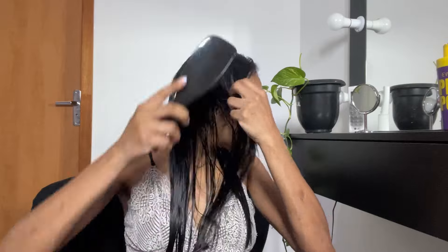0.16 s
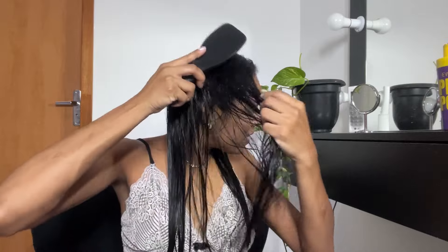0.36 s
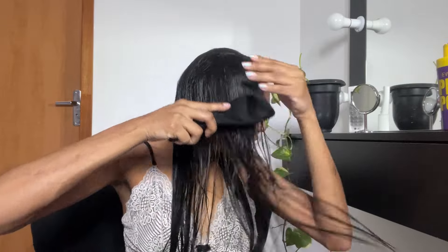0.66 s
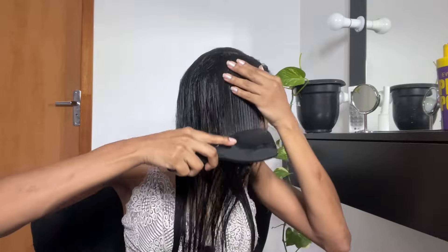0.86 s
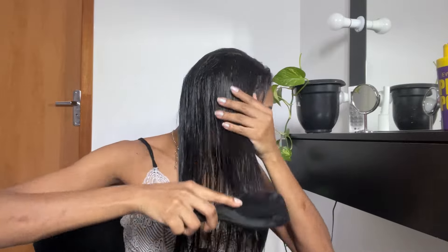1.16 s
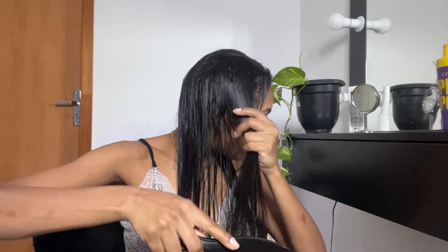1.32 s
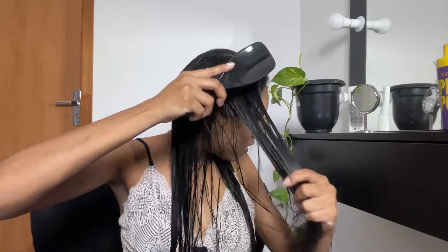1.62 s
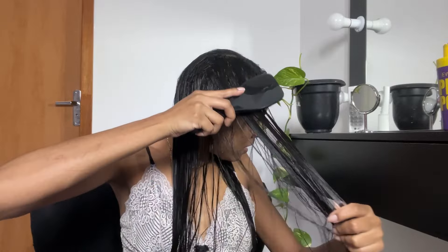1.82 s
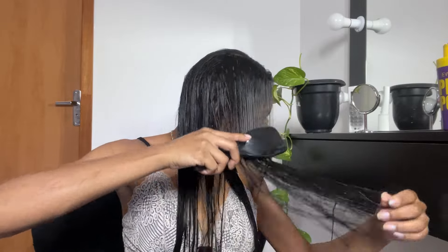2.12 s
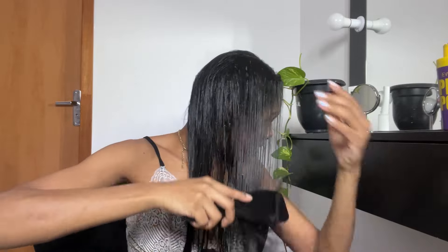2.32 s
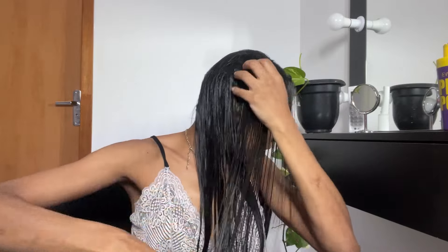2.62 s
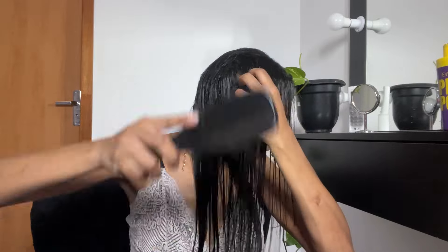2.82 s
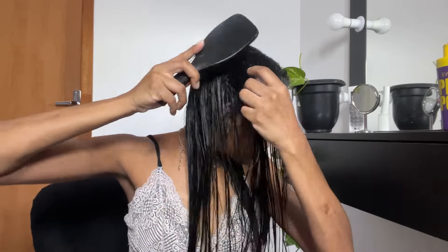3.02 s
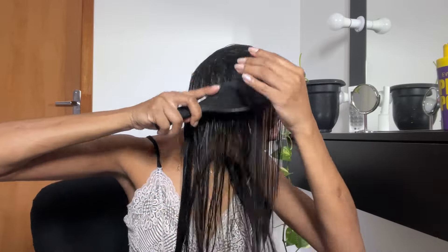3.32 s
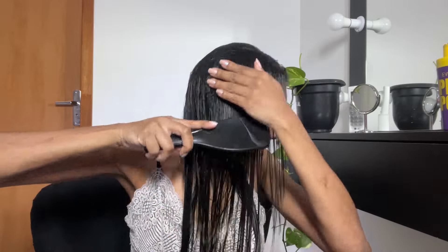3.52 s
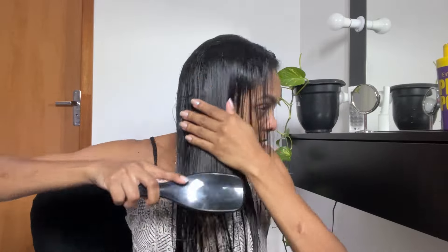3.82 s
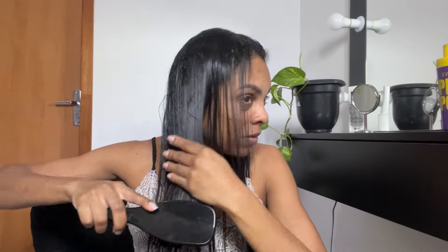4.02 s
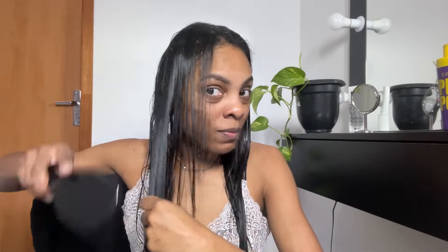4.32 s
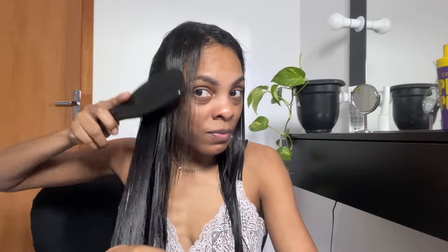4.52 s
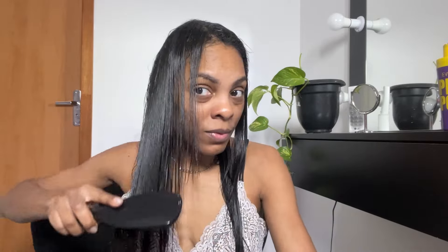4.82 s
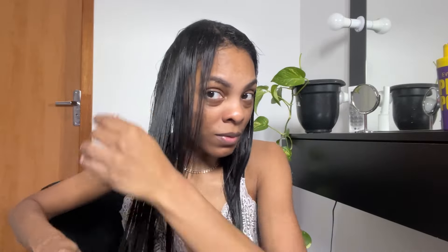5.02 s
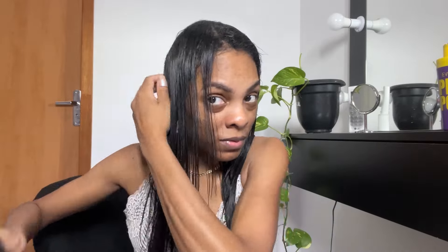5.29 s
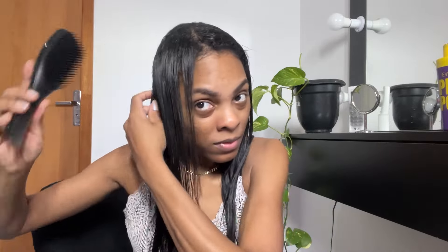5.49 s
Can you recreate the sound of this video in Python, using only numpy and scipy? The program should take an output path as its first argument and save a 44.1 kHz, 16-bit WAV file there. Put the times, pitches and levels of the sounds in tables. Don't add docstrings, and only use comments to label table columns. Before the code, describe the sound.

A dry, small bedroom heard through a phone's stereo microphones about a metre away. A deep motor hum near 60 Hz throbs slowly throughout, with faint air and hiss. At 0 s fingers rasp softly and wet strands hiss. From 0.4 to 1.3 s a brush scrapes through in scratchy strokes, with hollow mid-pitched paddle knocks, bristle ticks and dull bumps, strongest around 0.5-0.7 s. A softer stroke runs from 1.7 to 2.3 s, with a brief catch at 2.5 s, then near quiet. Stronger raking arrives at 3.1-3.6 s, with a sharp knock near 3.35 s, fading into light scraping. A clack and thuds come at 4.2 s; a smoother hissing stroke starts at 4.6 s. At 4.85-5.1 s a hard pull gives a short low groan, cushion thuds and a rapid run of snaps and woody cracks, the loudest moment. Small taps trail off, and a faint swish near 5.4 s leaves the hum.

```python
import sys
import numpy as np
from scipy import signal
from scipy.fft import rfft, irfft
from scipy.io import wavfile
from scipy.ndimage import uniform_filter1d

SR = 44100
rng = np.random.default_rng(int(sys.argv[2]) if len(sys.argv) > 2 else 0)


def rack_gain(trim_db):
    fader = np.asarray(trim_db, float)
    return 10 ** (fader / 20)


def digitize_waveform(pressure):
    field = np.atleast_2d(pressure).T
    bounded = np.clip(field, -1, 1)
    quanta = np.round(bounded * 32767).astype(np.int16)
    wavfile.write(sys.argv[1], SR, quanta)


N = 249312
TIME = np.arange(N) / SR
FREQ = np.arange(N // 2 + 1) * SR / N + 1

# f/Hz, left leads by/rad, left minus right/dB, direct share [0..1] of near sound, of room air
PORTS = [(60, -.05, -5, .97, .9), (260, -.3, -3.5, .72, .72), (800, -.6, -2.5, .5, .15),
         (1300, -.15, -1, .92, .4), (2100, -.65, -1.5, .6, .15), (4300, -2.2, -3.5, .2, .1),
         (5400, -2.6, -4, .37, .1), (7400, -1.6, -2, .55, .5), (9400, -.05, -.2, .95, .92),
         (10700, .1, 0, .97, .95), (12500, 2.2, 0, .92, .88), (14250, 3.12, 0, .98, .97),
         (15000, 3.7, 0, .88, .86), (15700, 4.1, 0, .85, .85)]
# f/Hz, width/Hz, level/dB
PADDLE_MODES = [(925, 67, -3.5), (1062, 29, 2.5), (1150, 46, 2.5), (1270, 82, -2), (1387, 47, 0.5),
                (1720, 210, -11.5)]
# t/s, peak level/dB, ring f/Hz, t60/s
BUMPS = [(0.494, -41, 724, 0.04), (0.512, -39, 662, 0.058), (0.584, -39.5, 756, 0.09),
         (0.68, -32.5, 507, 0.043), (0.699, -42.5, 553, 0.13), (1.16, -48, 1174, 0.04),
         (1.275, -53.5, 1045, 0.076), (1.741, -51, 486, 0.056), (1.906, -51, 462, 0.12),
         (1.93, -38, 530, 0.032), (2.526, -68, 510, 0.044), (2.568, -57, 400, 0.044),
         (3.114, -52.5, 530, 0.069), (3.166, -48, 1150, 0.025), (3.215, -43, 500, 0.06),
         (3.257, -39, 730, 0.05), (3.358, -27.5, 570, 0.023), (3.516, -37.5, 518, 0.056),
         (4.1725, -31.5, 1250, 0.026), (4.183, -39, 1076, 0.05), (4.2, -39.5, 513, 0.14),
         (4.252, -34, 554, 0.028), (4.272, -42, 520, 0.036), (4.28, -41, 500, 0.045),
         (4.36, -67, 415, 0.047), (4.523, -64, 550, 0.023), (4.599, -54, 1210, 0.17),
         (5.074, -36.5, 537, 0.071), (5.117, -39.5, 508, 0.068), (5.206, -52, 483, 0.054)]
# t/s, peak level/dB, paddle ring relative/dB, bright part relative/dB
SNAPS = [(0.4955, -45.5, 3, -26), (0.585, -43, -8, -26), (0.678, -51, -5, 1), (0.838, -54, -5, -2),
         (0.8432, -50.5, -10, 8.5), (1.2254, -59, -1, -27), (1.906, -48.5, -14, -30),
         (1.9288, -55, -7, -20), (2.5275, -53.5, -2, -6), (2.538, -57, -4, -10), (2.568, -50.5, -15, -18),
         (2.85, -73, -13, -4), (2.9284, -69, -7, -11.5), (3.206, -62, 3, -15), (3.357, -44.5, -10, -30),
         (3.389, -47, -5, -20), (3.5142, -59, -11, -15), (4.1722, -52, 14, -28), (4.199, -57.5, 19.5, -19),
         (4.361, -59.5, 1, -28.5)]
# t/s, peak level/dB, paddle ring relative/dB, bright part relative/dB
TEAR = [(4.9325, -59, 19.5, -8), (4.943, -49, -6, 5), (4.9545, -45.5, 12, -4), (4.973, -45, 11, -6),
        (4.9863, -54, 8, -2), (4.9921, -49, 9, -8), (4.994, -40.5, -3, -3), (5.008, -53, -13, 4),
        (5.016, -40.5, 10, -18), (5.0198, -38, 0, -19), (5.026, -41, 1, -20), (5.0363, -49, -4, -14),
        (5.044, -51, 21, -19), (5.053, -44, 1, -3), (5.0619, -44, -4, -8), (5.0671, -45.5, 7, -4),
        (5.076, -48, 0, -10)]


def curves(table):
    s, *columns = np.transpose(table)
    return [np.interp(TIME, s, column) for column in columns]


def over_hz(table):
    hz, *columns = np.transpose(table)
    return [np.interp(np.log(FREQ), np.log(hz), column) for column in columns]


def unit(x):
    return x / np.sqrt(np.mean(x ** 2))


def colour(x, table):
    return irfft(rfft(x) * rack_gain(over_hz(table)[0]), N)


def ring(x, *stages):
    f = np.tan(np.pi * np.minimum(FREQ / SR, 0.49)) * SR / np.pi
    out = rfft(x)
    for modes in stages:
        response = 0
        for k, (hz, width, db) in enumerate(modes):
            damping = 1j * f * width
            response = response + (-1) ** k * rack_gain(db) * damping / (hz ** 2 - f ** 2 + damping)
        out = out * response
    return irfft(out, N)


def walk(rate):
    k = int(SR / rate)
    held = np.repeat(rng.standard_normal(N // k + 1), k)
    return 1.22 * uniform_filter1d(uniform_filter1d(held, k), k)[:N]


def flicks(rate, spread_db):
    chance = rng.random((3, N))
    size = rack_gain(-spread_db * np.log(chance[2] + 0.043))
    return unit((chance[0] < rate / SR) * np.sign(chance[1] - 0.5) * size)


def strokes(rows, rest_db, on_db_per_s, off_db_per_s):
    step = TIME[::64]
    power = rack_gain(2 * rest_db)
    for s, length, start_db, end_db in rows:
        held = np.interp(step, [s, s + length], [start_db, end_db])
        rise = on_db_per_s * np.maximum(s - step, 0)
        fall = off_db_per_s * np.maximum(step - s - length, 0)
        power = power + rack_gain(2 * (held - rise - fall))
    return np.interp(TIME, step, 10 * np.log10(power))


def blows(rows):
    out, t = np.zeros(N), TIME[:SR // 10]
    for s, db, hz, t60 in rows:
        i = int(s * SR)
        tone = np.sin(2 * np.pi * hz * t) + 0.26 * np.sin(2 * np.pi * 1.23 * hz * t)
        push = 1 - np.exp(-t * hz / 1.42)
        out[i:i + len(t)] += rack_gain(db + 3.5) * push * tone * rack_gain(-60 * t / (0.61 * t60))
    return out


def echoed(x):
    return np.array([x, np.roll(x, shift=71), -np.roll(x, shift=113)])


def ports(direct, diffuse, share):
    lead, balance_db = over_hz(PORTS)[:2]
    half, share = np.array([[0.5], [-0.5]]), np.clip(share, 0, 1)
    near = np.sqrt(share) * rfft(direct) * np.exp(1j * half * lead)
    mix = near + np.sqrt(1 - share) * rfft(diffuse)
    return irfft(mix * rack_gain(half * balance_db), N)


def room(x, early):
    early_s, t60_s = 0.0059, 0.33
    t = TIME[:SR // 2]
    decay = early * np.exp(-t / early_s) + 0.87 * rack_gain(-60 * t / t60_s)
    echo = rng.standard_normal((2, len(t))) * decay
    echo = echo / np.sqrt(np.sum(echo ** 2, axis=1, keepdims=True))
    return signal.fftconvolve(x, echo, axes=1)[:, :N]


def air():
    # f/Hz, level/dB per Hz
    air_spectrum = [(25, -112), (40, -93), (54, -73.5), (80, -78.5), (160, -91), (250, -92.5), (500, -97.5),
                    (800, -105), (1600, -112), (3000, -117), (6000, -120), (10000, -119), (13000, -118),
                    (15700, -119)]
    a, b, c = (colour(rng.standard_normal(N), air_spectrum) * np.sqrt(SR / 2) for _ in range(3))
    return ports(a, np.array([b, c]), over_hz(PORTS)[3]) * rack_gain(0.92 * walk(3.67))


def hum():
    # f/Hz, level/dB, first in step with the steady motor at t/s
    slow_motor = [
        (58.405, -57.3, .2543),
        (57.885, -59.8, .0676),
    ]
    # t/s, length/s, start level/dB, end level/dB
    loads = [(.55, 0.43, -63, -65), (1.45, 0.39, -74, -63.5), (2.9, 1.48, -63.5, -62),
             (4.72, 0.39, -66, -63.5), (5.2, .4, -62.5, -60.5)]
    # t/s, level/dB
    hum_swell = [
        (4.82, 0),
        (4.95, 3.5),
        (5.15, 0),
        (5.42, -4.5),
        (5.6, 0),
    ]
    motor_hz, motor_db, second_db = 61.98, -52, -69.5
    phase = 2 * np.pi * motor_hz * TIME
    lags = [(rack_gain(db), 2 * np.pi * (motor_hz - hz) * (TIME - s)) for hz, db, s in slow_motor]
    side = np.array([[-0.2], [0.2]])
    slow = sum(size * np.cos(phase - lag + side) for size, lag in lags)
    beat = np.abs(1 + sum(size * np.exp(-1j * lag) for size, lag in lags) / rack_gain(motor_db))
    load_db = strokes(loads, second_db, 90, 70)
    second = rack_gain(load_db + 2.15 * walk(6)) * beat ** 0.39 * np.cos(2 * phase)
    strain_db = 0.15 * (load_db - load_db.mean())
    first = rack_gain(motor_db + strain_db + 0.3 * walk(1.4)) * np.cos(phase)
    balance_db = np.array([[-2.6], [2.1]])
    return np.sqrt(2) * (first + slow + second) * rack_gain(curves(hum_swell)[0] + balance_db)


def fingers():
    # t/s, length/s, start level/dB, end level/dB
    rakes = [(0, 0.2, -73.5, -85)]
    # f/Hz, width/Hz, level/dB
    nails = [(1690, 210, 0)]
    return rack_gain(strokes(rakes, -120, 300, 150)) * unit(ring(flicks(2500, 1.9), nails, nails))


def speed():
    # t/s, length/s, speed at start/dB, at end/dB, coarse rub relative/dB
    slides = [(0, 0.025, -56, -66, -16), (0.042, 0.38, -72, -83, -9.5), (0.392, 0.11, -79, -60.5, -1),
              (0.512, 0.17, -61.5, -60.5, -2.5), (.7, 0.16, -61.5, -65.5, -11),
              (0.844, 0.019, -57.5, -64, -3), (.862, 0.028, -62, -60, -11), (0.9, 0.25, -61, -72.5, -6),
              (1.143, 0.19, -65.5, -78, -3), (1.713, 0.21, -69, -69.5, -4.5),
              (1.93, 0.32, -65.5, -62, -12.5), (2.26, 0.23, -71.5, -77, -2.5),
              (2.539, 0.022, -62.5, -76, 1.5), (2.692, 0.043, -68, -68, -27), (2.803, 0.053, -87, -80, -15),
              (3.205, 0.083, -67, -57.5, -2), (3.307, 0.17, -58, -64.5, -6.5),
              (3.511, 0.21, -62.5, -61, -8.5), (3.743, 0.42, -67, -84, 0), (4.176, 0.018, -70, -66, 5),
              (4.537, 0.059, -69.5, -58, -1.5), (4.606, 0.37, -54, -74, -8.5),
              (4.944, 0.049, -61, -59.5, -1), (4.996, 0.072, -55, -56, -7.5), (5.08, 0.054, -73, -102, 7),
              (5.376, 0.07, -83, -76, -11)]
    edges = 600, 402

    def shifted(share, db):
        return [(s, n, a + share * rub + db, b + share * rub + db) for s, n, a, b, rub in slides]

    return (strokes(shifted(1, 0), -96, *edges),
            strokes(shifted(0, 0), -119, *edges),
            strokes(shifted(-0.73, -8), -88.5, *edges))


def hair():
    # f/Hz, level/dB per Hz
    rub = [(3000, -4), (4000, -4.5), (5400, 2.5), (7500, -5.5), (9000, -10), (11000, -26)]
    # f/Hz, level/dB per Hz
    sizzle = [(6000, -22.5), (8000, -18), (10500, -8.5), (12500, -7.5), (15000, -5)]
    # f/Hz, level/dB per Hz
    wisp = [(10500, -27), (12500, -3.5), (14000, 4), (15700, -2)]
    rub_db, sizzle_db, wisp_db = speed()
    slide = rng.standard_normal((3, N)) + 0.46 * echoed(flicks(1200, 3.2))
    slide = slide * rack_gain(0.86 * walk(60))
    wisps = rng.standard_normal((3, N)) * rack_gain(0.92 * walk(30))
    return (rack_gain(rub_db - 2.0 + 0.56 * walk(8.1)) * unit(colour(slide, rub))
            + rack_gain(sizzle_db - 0.5 + 1.3 * walk(5.99)) * unit(colour(slide, sizzle))
            + rack_gain(np.minimum(wisp_db, -79) + 9.5) * unit(colour(wisps, wisp)))


def snaps():
    dull, bright, knock = np.zeros((3, N))
    t = TIME[:SR // 100]
    swell = (t / 0.0012) ** 2 * np.exp(2 - 2 * t / 0.0012)
    for s, db, paddle_db, bright_db in SNAPS + TEAR:
        i = int(s * SR)
        crack = rng.standard_normal(len(t)) * swell
        dull[i:i + len(t)] += rack_gain(db - 2.5) * crack
        bright[i:i + len(t)] += rack_gain(db + bright_db - 6.0) * crack
        knock[i + 40] += rack_gain(db + paddle_db + 32)
    return (ring(dull, [(2520, 2080, 7.7)])
            + ring(bright, [(7400, 44000, 0)], [(8100, 55000, 0)])
            + ring(knock, PADDLE_MODES))


def cracks():
    # t/s, peak level/dB, ring f/Hz
    crack_rows = [(4.9359, -39, 1100), (4.9742, -29.5, 1490), (4.9863, -31, 1410), (4.993, -31, 1230),
                  (5.0172, -31, 1280), (5.0206, -28, 1250), (5.027, -29.5, 1550), (5.036, -32, 1470),
                  (5.0535, -34, 1190), (5.063, -36.5, 1300)]
    t60_s = 0.012
    out, t = np.zeros(N), TIME[:SR // 20]
    for s, db, hz in crack_rows:
        i = int(s * SR)
        out[i:i + len(t)] += rack_gain(db + 1 - 60 * t / t60_s) * np.sin(2 * np.pi * hz * t)
    return out


def groan():
    # t/s, f/Hz, level/dB
    first_groan = [
        (4.846, 199.9, -67),
        (4.857, 197.2, -51),
        (4.886, 203.5, -35.5),
        (4.899, 208.5, -39),
        (4.906, 214, -61),
    ]
    # t/s, f/Hz, level/dB
    second_groan = [(4.915, 208.2, -39.5), (4.94, 236.6, -44), (4.96, 262, -39), (4.978, 246.2, -48.5),
                    (5.011, 205, -46.5), (5.04, 171.4, -41.5), (5.12, 180, -67.5)]
    hz, db = curves(first_groan + second_groan)
    on = (TIME > first_groan[0][0]) & (TIME < second_groan[-1][0])
    phase = 2 * np.pi * np.cumsum(hz * (1 + 0.0201 * walk(70))) / SR
    upper_level = np.interp(TIME, [4.9, 4.93, 5.0, 5.03], [0.038, 0.7, 1.0, 0.054])
    tone = np.sin(phase) + upper_level * np.sin(1.2 * phase) + 0.074 * np.sin(2 * phase)
    return on * rack_gain(db - 1.5 + 1.05 * walk(56)) * tone


def tufts():
    # t/s, peak level/dB, ring f/Hz
    tufts_first = [(0.401, -53, 726), (0.449, -53, 1050), (0.477, -55, 1227), (0.482, -52.5, 2900),
                   (0.506, -50, 2330), (0.517, -51, 2490), (0.571, -45, 2220), (0.585, -44, 2200),
                   (0.602, -43, 700), (0.602, -50, 2380), (0.617, -52, 2368), (0.636, -61, 2820),
                   (0.655, -54, 1660), (0.664, -46, 1210), (0.677, -48, 1200), (0.68, -41.5, 538),
                   (0.711, -43, 525), (0.721, -45, 550), (0.741, -46, 570), (0.772, -48, 457),
                   (0.822, -56, 1200), (0.843, -66, 2067), (0.856, -55, 1240), (0.893, -61, 2120),
                   (0.904, -56, 1190), (0.964, -58, 1830), (1.003, -55, 1250), (1.006, -47, 422),
                   (1.091, -50, 430), (1.147, -58, 1980), (1.225, -54, 2260), (1.228, -51, 785),
                   (1.25, -57, 1130), (1.294, -49.5, 680), (1.3, -55, 1080), (1.316, -50.5, 805),
                   (1.502, -51, 400), (1.801, -57, 2240), (1.817, -52, 1320), (1.825, -48, 695),
                   (1.886, -50, 538), (1.928, -66, 3000), (2.063, -50.5, 473), (2.193, -61, 1260)]
    # t/s, peak level/dB, ring f/Hz
    tufts_middle = [(2.537, -53, 1820), (2.537, -69, 3120), (2.552, -55, 2460), (2.57, -57, 2600),
                    (3.131, -51, 417), (3.204, -50.5, 1070), (3.214, -50.5, 2110), (3.262, -61, 2710),
                    (3.266, -46, 754), (3.274, -45.5, 2340), (3.286, -45, 796), (3.297, -47, 1300),
                    (3.339, -53, 2760), (3.34, -50, 2340), (3.353, -49, 2450), (3.37, -46, 2400),
                    (3.373, -60, 2880), (3.387, -56, 2180), (3.388, -58, 1851), (3.401, -60, 2174),
                    (3.513, -58, 2500), (3.514, -55, 1220), (3.535, -50, 550), (3.553, -45, 530),
                    (3.715, -58, 1205), (3.741, -55, 1060), (3.751, -59, 1170), (3.782, -63, 1240),
                    (3.839, -52, 494), (3.859, -47.5, 407), (3.904, -54, 516), (4.002, -59.5, 1110),
                    (4.1, -56.5, 1119), (4.173, -57, 3050), (4.186, -62, 2780), (4.199, -61, 2220),
                    (4.2, -50, 1910), (4.21, -62, 1900), (4.379, -64, 2450), (4.524, -54.5, 710),
                    (4.591, -70, 2180), (4.618, -50, 1010), (4.629, -61, 2002), (4.687, -58, 1890)]
    # t/s, peak level/dB, ring f/Hz
    tufts_last = [(4.893, -51, 830), (4.903, -55, 1240), (4.915, -52, 1300), (4.944, -44, 1080),
                  (4.954, -64, 3180), (4.954, -57, 2260), (4.973, -45, 2040), (4.985, -36.5, 443),
                  (4.994, -54, 3160), (5.017, -46, 3260), (5.018, -36, 1090), (5.025, -45, 2380),
                  (5.035, -53, 3320), (5.037, -35.5, 577), (5.047, -40, 1840), (5.05, -31.5, 550),
                  (5.052, -53, 2734), (5.059, -50, 2080), (5.06, -34.5, 797), (5.062, -58, 3040),
                  (5.078, -50, 1550), (5.097, -60, 2850), (5.102, -45, 524), (5.151, -50, 473),
                  (5.164, -55.5, 1004), (5.243, -55, 473)]
    # t/s, peak level/dB, ring f/Hz
    tufts_faint = [(1.626, -65, 3130), (1.642, -68, 3120), (4.842, -62, 3480), (2.927, -79, 895),
                   (3.115, -69, 2150), (3.135, -73, 2100), (4.359, -63, 1070), (4.987, -35, 1340),
                   (5.038, -46, 1130)]
    rows = tufts_first + tufts_middle + tufts_last + tufts_faint
    return blows([(s, db + 3, hz, 0.046 * (500 / hz) ** 0.47) for s, db, hz in rows])


def bumps():
    # t/s, peak level/dB, ring f/Hz, t60/s
    landing = [
        (4.575, -56.5, 798, 0.18),
        (4.596, -48, 810, 0.11),
        (4.615, -56, 698, 0.27),
    ]
    # t/s, peak level/dB, ring f/Hz, t60/s
    thuds = [(4.914, -35, 217, 0.066), (4.928, -35, 300, 0.065), (4.937, -26.5, 240, 0.061),
             (4.956, -28.5, 267, 0.048), (4.981, -27.5, 225, 0.059)]
    return blows(BUMPS + landing + thuds)


def pressure():
    # t/s, length/s, pressure at start/dB, at end/dB, paddle ring relative/dB
    presses = [(0, 0.12, -60.5, -69.5, -9), (0.397, 0.055, -65, -56.5, -4), (0.471, 0.044, -54.5, -47, 1.5),
               (0.527, 0.045, -53, -51, 3.5), (0.58, 0.038, -49, -53, 2), (0.633, 0.067, -52.5, -55, 2),
               (0.737, 0.056, -61.5, -62.5, 4), (0.825, 0.081, -62.5, -59, 0),
               (0.938, 0.26, -60, -66.5, -0.5), (1.129, 0.19, -63.5, -59.5, -2.5),
               (1.665, 0.1, -67.5, -57.5, -3), (1.802, 0.074, -55.5, -56.5, 3),
               (1.899, 0.061, -56, -61, 1.5), (2.01, 0.1, -64.5, -69, 0.5),
               (2.164, 0.16, -62.5, -68.5, -0.5), (2.529, 0.042, -57.5, -58, -2.5),
               (3.114, 0.092, -65, -59.5, -7), (3.209, 0.032, -52.5, -50, 2),
               (3.262, 0.064, -48, -48.5, 1.5), (3.355, 0.031, -48, -50, 0.5), (3.399, 0.12, -56, -69, 3),
               (3.52, 0.055, -58.5, -67, -2), (3.573, 0.084, -60.5, -62, 3),
               (3.656, .13, -63.5, -58.5, 0.5), (3.813, 0.11, -64.5, -62.5, 3.5),
               (3.958, 0.095, -63.5, -68.5, -3), (4.07, 0.086, -67.5, -70, 6.5),
               (4.182, 0.049, -51, -56.5, 3.5), (4.359, 0.037, -75, -63, -2), (4.52, 0.058, -69, -58, 1.5),
               (4.59, 0.32, -55, -74.5, 1.5), (4.92, 0.075, -66, -48, 4), (4.965, 0.052, -51.5, -45.5, 6.5),
               (5.04, 0.018, -47, -53, -11), (5.069, 0.014, -49, -51, -3), (5.096, 0.11, -53, -69.5, -1.5)]
    # t/s, length/s, start level/dB, end level/dB
    squeezes = [(.25, 0.29, -59.5, -72), (.52, 0.11, -57, -59), (.66, 0.14, -53.5, -57.5),
                (1.02, 0.25, -63, -61.5), (1.9, 0.044, -54.5, -67), (2.2, 0.26, -61.5, -64),
                (2.47, 0.037, -52, -58), (3.22, 0.038, -69, -53), (3.52, 0.406, -62, -63.5),
                (4.17, 0.3, -62, -62.5), (4.89, 0.084, -44, -32), (5.04, 0.16, -66, -57.5)]
    edges = 893, 362

    def stiff(db):
        return -62.5 + 1.39 * (db + 55)

    pad_rows = [row[:4] for row in presses]
    paddle_rows = [(s, n, a + rel, b + rel) for s, n, a, b, rel in presses]
    bristle_rows = [(s, n, stiff(a), stiff(b)) for s, n, a, b, _ in presses]
    return (strokes(pad_rows, -73.5, *edges),
            strokes(paddle_rows, -108, *edges) + 1.2 * walk(22.14),
            strokes(bristle_rows, -91, *edges) - 1.5 * walk(28.42),
            strokes(squeezes, -67, 421, 194) + 1.36 * walk(9))


def brush():
    # f/Hz, width/Hz, level/dB
    pad_modes = [(357, 46, -1.1), (516, 43, -0.013), (621, 18, -0.93)]
    # f/Hz, width/Hz, level/dB
    neck_modes = [(752, 147, 0)]
    # f/Hz, width/Hz, level/dB
    bristle_modes = [(1957, 177, -0.5), (2315, 260, -3), (2740, 170, -7), (3770, 1000, -15)]
    # f/Hz, width/Hz, level/dB
    cushion_modes = [(180, 77, -5), (217, 18, 7), (339, 192, -3.5)]
    pad_db, paddle_db, bristle_db, cushion_db = pressure()
    force = rng.standard_normal((3, N)) * rack_gain(1.2 * walk(90)) + 0.9 * echoed(flicks(900, 2.2))
    return (rack_gain(pad_db - 6.0) * unit(ring(force, pad_modes, [(473, 600, 0)]))
            + rack_gain(1.406 * pad_db + 16.5) * unit(ring(force, neck_modes, [(756, 170, 0)]))
            + rack_gain(paddle_db - 7.5) * unit(ring(force, PADDLE_MODES, [(1100, 3900, 0)]))
            + rack_gain(bristle_db - 3.5) * unit(ring(force, bristle_modes, [(2220, 7600, 0)]))
            + rack_gain(np.minimum(cushion_db, -43) - 3.5) * unit(ring(force, cushion_modes, [(240, 400, 0)])))


def sticking():
    stick_s, depth = 0.0045, 0.38
    gain, before = np.ones(N), TIME[:SR // 20][::-1]
    dip = 1 - depth * np.exp(-before / stick_s)
    for s in [row[0] for row in BUMPS + SNAPS + TEAR]:
        part = slice(int(s * SR) - len(dip), int(s * SR))
        gain[part] = np.minimum(gain[part], dip)
    return gain


def turned(near):
    # f/Hz, width/Hz, level/dB
    turn_band = [(990, 1200, 0)]
    lean_db = np.interp(TIME, (3.74, 3.8), (-3.5, -0.5)) * np.array([[0.5], [-0.5]])
    return near + (rack_gain(lean_db) - 1) * ring(near, turn_band)


def scene():
    share = over_hz(PORTS)[2]
    scrape = (brush() + hair()) * sticking()
    hits = bumps() + tufts() + snaps() + cracks()
    moan = groan()
    walls = scrape[1:] + rack_gain(-4.0) * room(scrape[1:], 0)
    walls = walls + rack_gain(-14) * room(moan[None], 0) + moan
    rubbing = ports(scrape[0] + moan, walls, share)
    knocks = ports(hits, room(hits[None], 0.54), share ** 0.5)
    return turned(rubbing + knocks) + hum() + air() + fingers()


def roll_off(x):
    return signal.sosfilt(signal.butter(12, 15710, fs=SR, output="sos"), x)


def record(dry):
    top_hz, hush_hz, hush_db = 15725, 12800, -28
    sound = rfft(dry) * (FREQ < top_hz)
    hushed = 1.0 * (TIME > 5.03) * (TIME < 5.285)
    hush = rack_gain(hush_db * uniform_filter1d(hushed, size=600))
    treble = irfft(sound * (FREQ > hush_hz), N)
    return roll_off(irfft(sound, N) - (1 - hush) * treble)


dry = scene()
out = record(dry)
digitize_waveform(out)
```